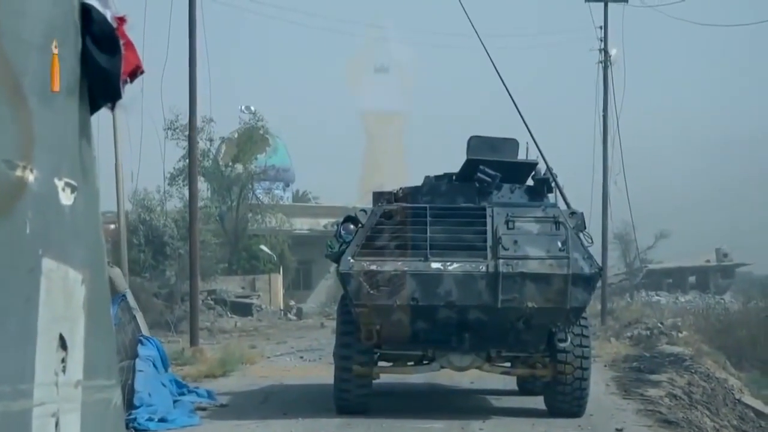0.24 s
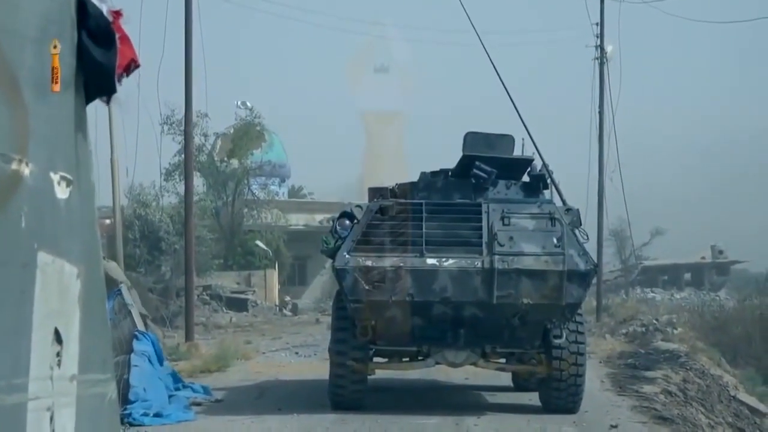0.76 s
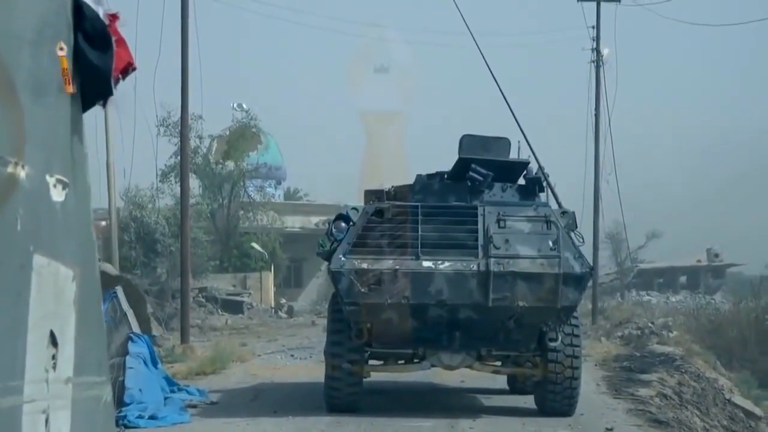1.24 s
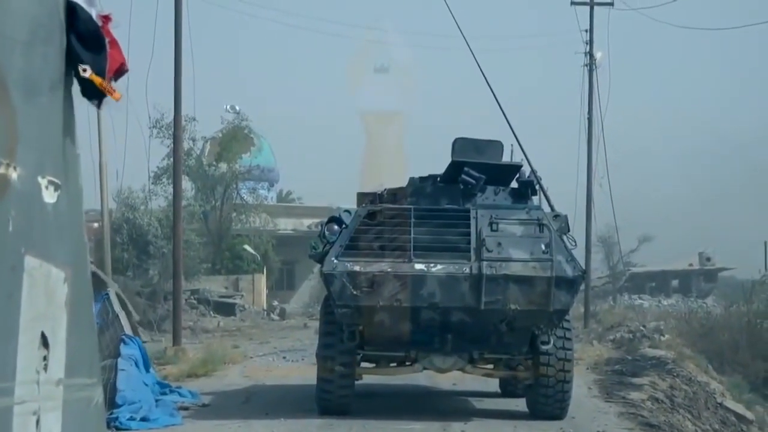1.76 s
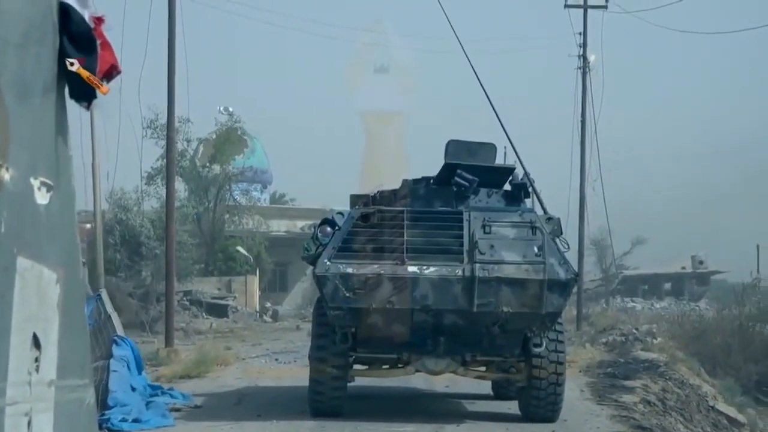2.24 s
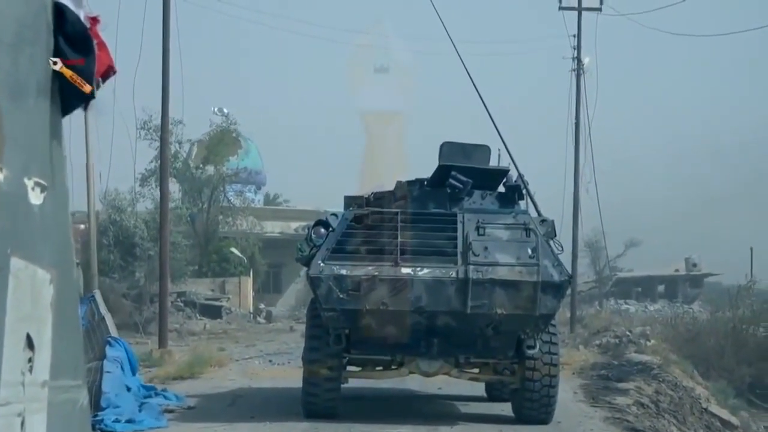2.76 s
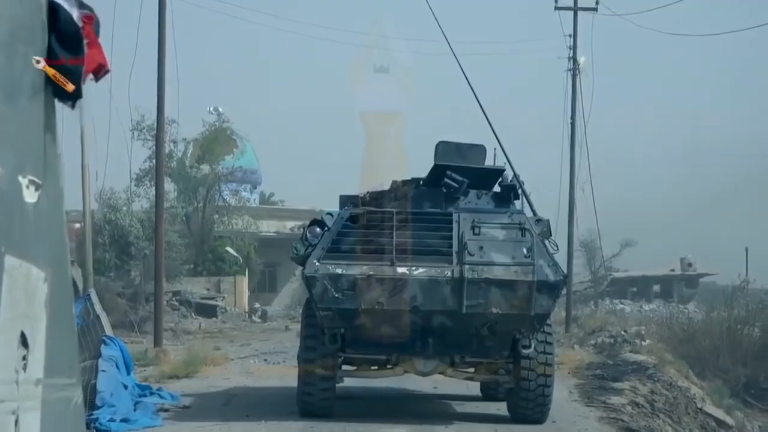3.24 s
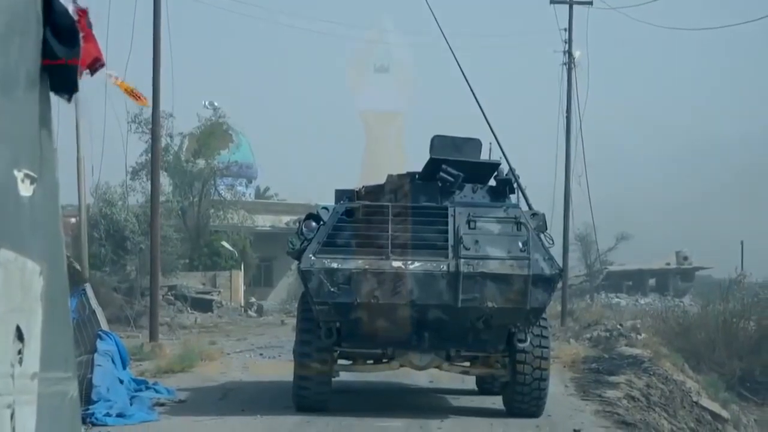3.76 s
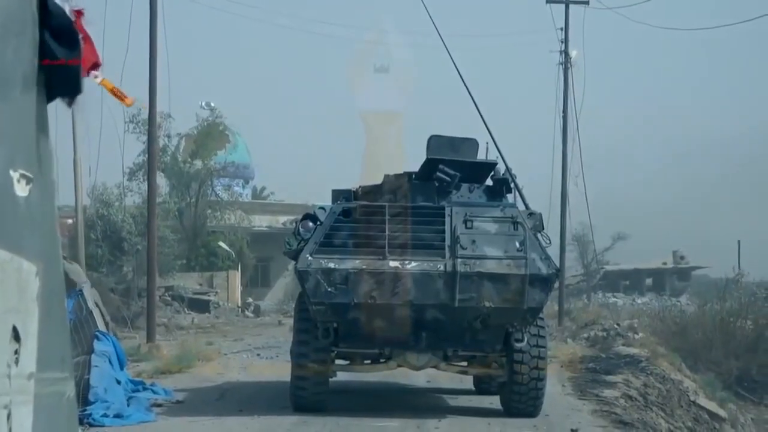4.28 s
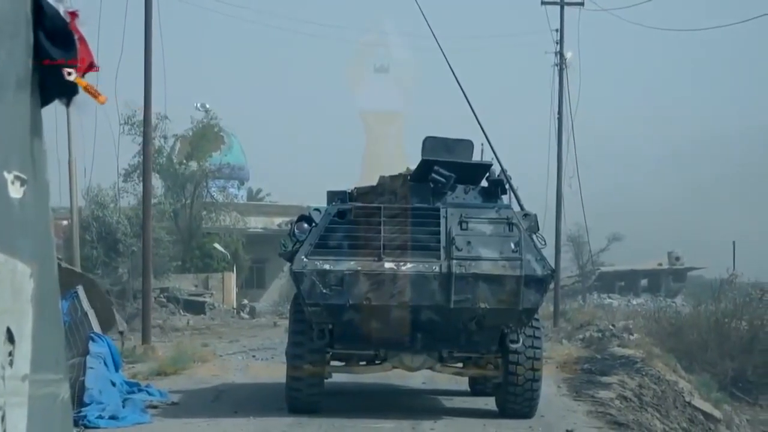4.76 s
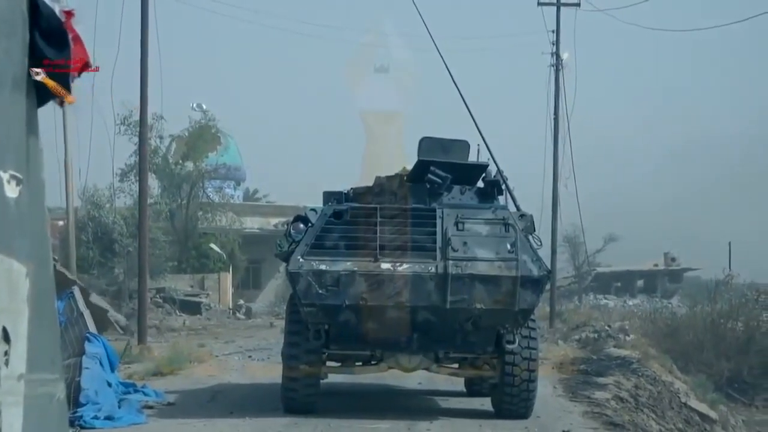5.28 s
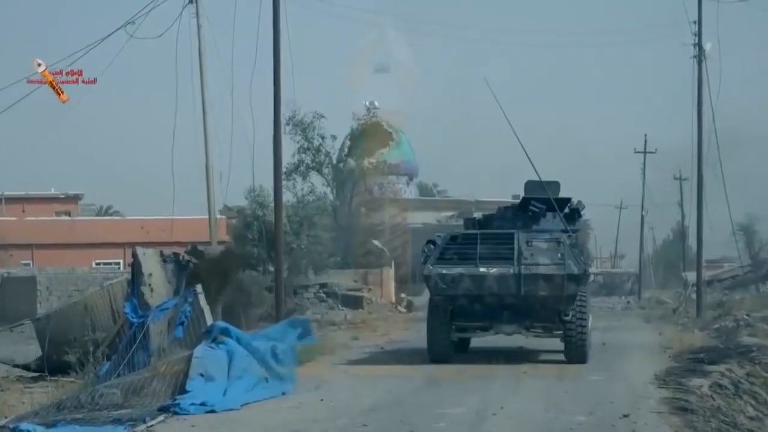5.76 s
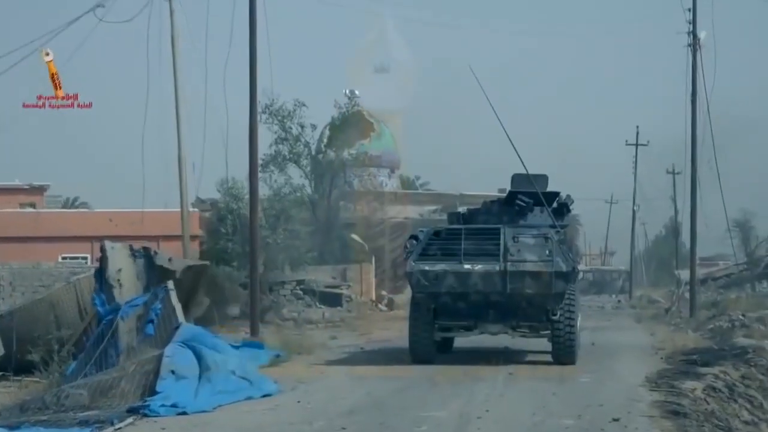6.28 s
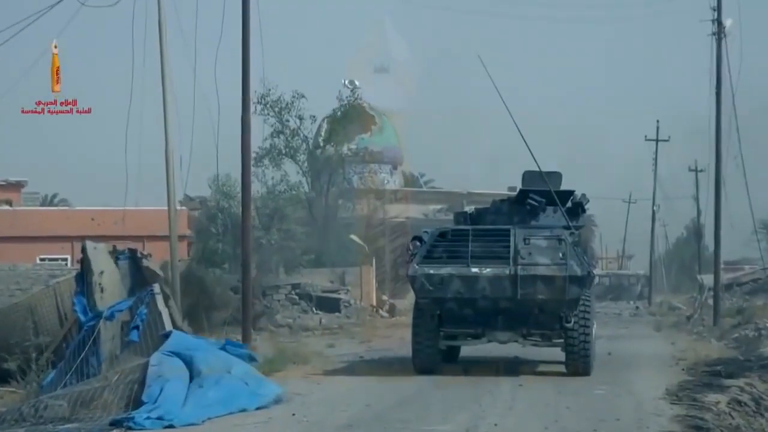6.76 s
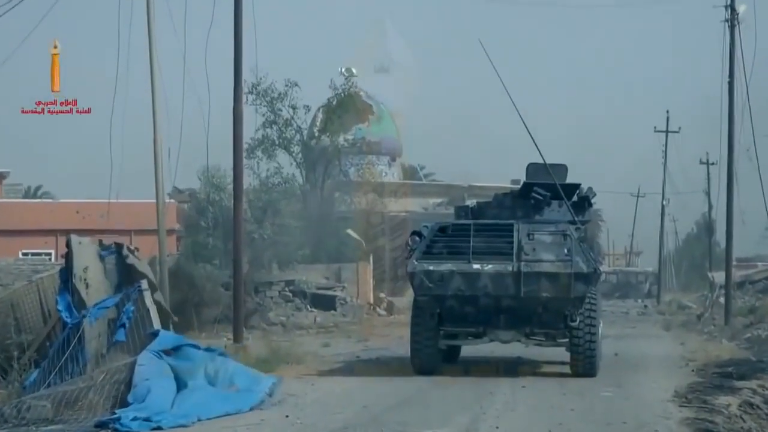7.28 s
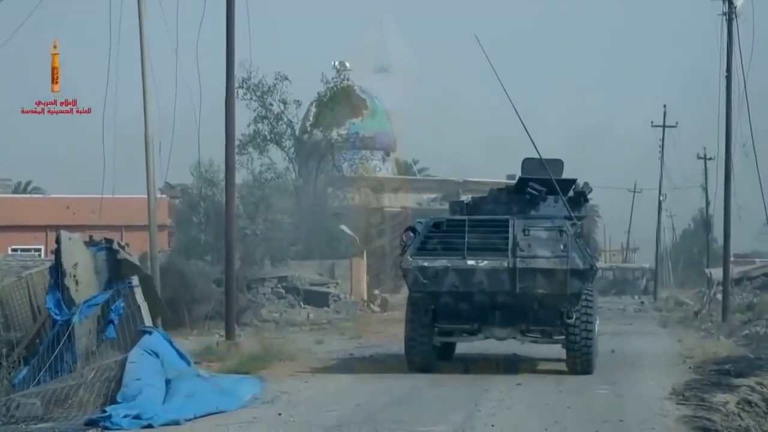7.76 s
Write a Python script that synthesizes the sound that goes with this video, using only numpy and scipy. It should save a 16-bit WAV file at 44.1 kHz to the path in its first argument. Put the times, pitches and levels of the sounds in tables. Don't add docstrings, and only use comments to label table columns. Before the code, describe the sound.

Rifle shots crack and echo between houses, then an armoured vehicle's heavy gun hammers out a long burst over its idling diesel engine.

```python
import sys
import numpy as np
from scipy import signal
from scipy.fft import rfft, irfft
from scipy.io import wavfile

SR = 44100
rng = np.random.default_rng(int(sys.argv[2]) if len(sys.argv) > 2 else 0)


def materialize(psi):
    bounded = np.clip(np.atleast_2d(psi).T, -1, 1)
    quanta = np.round(bounded * 32767).astype(np.int16)
    wavfile.write(sys.argv[1], SR, quanta)


def natural_amplitude(level_db):
    exponent = np.asarray(level_db, float) / 20
    return 10 ** exponent


N = 353682


def rms_one(x):
    return x / np.sqrt(np.mean(x ** 2) + 1e-20)


def band(x, low_hz, high_hz, order=2):
    edges_hz = [low_hz, min(high_hz, .45 * SR)]
    return signal.sosfilt(signal.butter(order, edges_hz, "band", fs=SR, output="sos"), x)


def peaks(x, resonances):
    for hz, width_hz, db in resonances:
        r = np.exp(-np.pi * width_hz / SR)
        top = [(1 - r * r) / 2, 0, (r * r - 1) / 2]
        bottom = [1, -2 * r * np.cos(2 * np.pi * hz / SR), r * r]
        x = x + (natural_amplitude(db) - 1) * signal.lfilter(top, bottom, x)
    return x


def coloured(spectrum, size):
    hz, db = np.transpose(spectrum)
    log_hz = np.log(np.maximum(np.fft.rfftfreq(size, 1 / SR), 1))
    tilt = natural_amplitude(np.interp(log_hz, np.log(hz), db))
    return rms_one(irfft(rfft(rng.standard_normal(size)) * tilt, size))


def drift(rate_hz, size):
    r = np.exp(-2 * np.pi * rate_hz / SR)
    return rms_one(signal.lfilter([1], [1, -2 * r, r * r], rng.standard_normal(size + SR))[SR:])


def add(out, s, sound):
    i = round(s * SR)
    out[i:i + len(sound)] += sound[:len(out) - i]


def blast(length_ms):
    u = np.arange(int(length_ms * SR / 1000) + 2) * 1000 / (length_ms * SR)
    return np.sin(2 * np.pi * np.minimum(u, 1) ** .75)


def fading(t60_s, size):
    return np.exp(-np.log(1000) * np.arange(size) / SR / t60_s)


def swells(t, peak_s, db, rise_s, fall_s):
    late = t[:, None] - peak_s
    rising, falling = -late / np.maximum(rise_s, 1e-4), late / np.maximum(fall_s, 1e-3)
    down = np.where(late < 0, rising, falling)
    return np.sqrt(np.sum(natural_amplitude(db - 20 * np.minimum(down, 10)) ** 2, axis=1))


# (f/Hz, level/dB per Hz)
SCATTER_COLOUR = [(24, -70), (40, -3.5), (220, 6), (697, -10.5), (1180, -6.5), (3560, -13.5), (4570, -23),
                  (5580, -26.5), (7730, -31), (8770, -39.5), (13800, -47.5), (16000, -69)]
ROUND_S = [5.4788, 5.6531, 5.8188, 5.9904, 6.1472, 6.3135, 6.4829, 6.6578, 6.8358, 7.0074, 7.1907, 7.3792,
           7.5535, 7.7275, 7.8952]
# (blast level/dB, far wall level/dB)
ROUND_DB = [(-1.5, -5), (-0.2, -5), (1.3, -6), (0, -10), (-2, -22), (-1.6, -8), (-1.5, -5), (-3.2, 0.5),
            (-3.5, -0.5), (-2.2, -1), (-2, -1), (-2, 3.5), (-2.5, -1.5), (-1.7, -4), (-2.5, -1)]
PATH_MS = [.08, .9, 2.45, 3.3, 4.3, 7.0, 8.5, 13.4, 15.95, 17.7, 23.7, 91.1]
PULSE_MS = [.75, 1.25, .75, 1.1, 1.5, 1.2, 3.0, 1.8, .7, 1.5, 1.0, .8]
PATH_DB = [2.5, -1, -2, -3, -5, -10, -8, -14, -3, -12, -8, -2]
CRACK_DB = [-6.5, -28, -12, -29, -17, -31, -29, -23, -18.5, -35, -21, -27]
# (t/s after blast, level/dB, bass against treble/dB, 20 dB rise t/s, 20 dB fall t/s)
SCATTER = [
    (-.022, -28.5, -4, .006, .11),
    (.003, -19, -12, .006, .02),
    (.0165, -20, -12, .003, .012),
    (.024, -24, -6, .003, .025),
    (.034, -33, 2, .015, .012),
    (.082, -27, -9, .05, .11),
    (.092, -21.5, -4, .003, .035),
    (.12, -28, -3, .05, .33),
]


def heavy_gun(repeat=0.73, grain_db=3.0):
    out, size, lead_s = np.zeros(N + SR), int(.55 * SR), .03
    s, high_db, bass_db, rise_s, fall_s = np.transpose(SCATTER)
    t = np.arange(size) / SR - lead_s
    low_shape = swells(t, s, high_db + bass_db, rise_s, fall_s)
    high_shape = swells(t, s, high_db, rise_s, fall_s)
    same = coloured(SCATTER_COLOUR, size) * natural_amplitude(grain_db * drift(180, size))
    push_t = np.arange(2000) / SR
    swing = push_t / .0045
    push = np.sin(2 * np.pi * 208 * push_t - 3.6) * swing * np.exp(1 - swing)
    push_db, echo_s, echo_db = -13, .0691, 1
    for at, (db, wall_db) in zip(ROUND_S, ROUND_DB):
        gain = natural_amplitude(db - 2.5)
        for delay_ms, length_ms, path_db, crack_db in zip(PATH_MS, PULSE_MS, PATH_DB, CRACK_DB):
            wobble = rng.normal(0, 1, 3)
            late = at + delay_ms / 1000 + 4e-5 * wobble[0]
            if delay_ms == PATH_MS[-1]:
                gain = gain * natural_amplitude(wall_db)
            pulse = blast(length_ms * (1 + .08 * wobble[2]))
            add(out, late, gain * natural_amplitude(path_db + 1.2 * wobble[1]) * pulse)
            crack = rng.standard_normal(1200) * fading(.01, 1200)
            add(out, late, gain * natural_amplitude(crack_db) * band(crack, 2200, 7500, order=1))
        add(out, at + .0001, natural_amplitude(db + push_db) * push)
        short_push = push * np.exp(-push_t / .012)
        add(out, at + echo_s, natural_amplitude(db + push_db + echo_db) * short_push)
        fresh = coloured(SCATTER_COLOUR, size) * natural_amplitude(grain_db * drift(188, size))
        scatter = rms_one(repeat * same + fresh)
        low = band(scatter, 30, 700)
        add(out, at - lead_s, natural_amplitude(8.5) * (low * low_shape + (scatter - low) * high_shape))
    return out[:N]


# (t/s, N wave level/dB, N wave t/ms, crack level/dB, bright edge level/dB)
SHOTS = [(0.938, -34, 1.1, -45, -55), (0.9617, -3, 1.2, -10, -31), (.963, 4.5, 1.03, -25, -18),
         (0.9641, -6, 0.93, -11.5, -14), (1.0202, -5.5, 1.3, -19, -28), (1.366, -22.5, 3.8, -31, -47),
         (1.3769, -8, 0.63, -19.5, -28), (1.892, -7.5, 1.4, -19, -34), (1.9659, -14, 0.29, -21, -52),
         (3.14, -37, 0.92, -54, -52), (3.187, -40, .9, -43, -46), (3.194, -50, .9, -46, -48),
         (5.6504, -2, 0.28, -8.5, -37), (6.987, -13, 0.52, -17, -44), (7.362, -17, 0.61, -10.5, -31),
         (7.878, -22, 0.43, -12.5, -42)]
# (t/s, N wave level/dB, N wave t/ms, crack level/dB)
SLAPS = [(0.9707, -9.5, 1.57, -41), (.974, -14, 3.2, -45), (1.015, -18, 1.8, -44),
         (1.0272, -14.5, 2.2, -30), (1.19, -23, 2.1, -34), (1.2098, -16, 2.3, -20.5),
         (1.226, -19, 2.6, -47), (1.251, -21, 2.7, -36), (1.279, -15, 0.65, -28.5), (1.353, -39.5, .8, -42),
         (1.426, -28, 0.98, -37), (1.498, -38, 1.1, -46), (1.527, -37, .32, -37.5), (1.583, -30.5, 2, -54),
         (1.892, -13, 3.8, -28), (1.9663, -7.5, 4.6, -20), (1.995, -14, 1, -33), (2.025, -12, 1.23, -28),
         (2.028, -23, 6.1, -35), (2.159, -30, 6.9, -46), (2.216, -24, 1.9, -49), (2.304, -24, 1.3, -39),
         (2.442, -31, 1.4, -47), (2.747, -26, 1.05, -52.5)]


def rifles():
    out, size = np.zeros(N), 8192
    shot_t60_s, slap_t60_s = 0.042, 0.05
    near = [(*row, shot_t60_s) for row in SHOTS]
    far = [(*row, -61 + 1.3 * (row[-1] + 30), slap_t60_s) for row in SLAPS]
    for at, wave_db, length_ms, crack_db, edge_db, t60_s in near + far:
        noise, fade = coloured(SCATTER_COLOUR, size), fading(t60_s, size)
        top_hz = min(16000 * natural_amplitude(.6 * wave_db), 16000)
        wave = band(np.pad(blast(length_ms), (0, 400)), 20, top_hz)
        add(out, at, natural_amplitude(wave_db) * wave)
        add(out, at, natural_amplitude(crack_db) * rms_one(band(noise, 570, 6600)) * fade)
        add(out, at, natural_amplitude(edge_db) * rms_one(band(noise, 4300, 15000)) * fade ** 2)
    return out


# (loudest t/s, level/dB, 20 dB rise t/s, 20 dB fall t/s)
CRACKLE = [
    (1.861, -14.5, .0008, .02),
    (1.868, -16, .006, .025),
    (1.891, -10, .012, .011),
    (1.965, -19, .03, .045),
]


def crackle(per_s=5400.0, spread_db=3.5):
    out, t = np.zeros(N), np.arange(1.85, 2.05, 1 / SR)
    sizes = natural_amplitude(spread_db * np.minimum(rng.exponential(1, len(t)), 4))
    sizes = sizes * rng.choice([-1, 1], len(t))
    happens = rng.random(len(t)) < per_s / SR
    snaps = band(band(sizes * happens, 600, 3020), 370, 3400, order=1)
    add(out, t[0], swells(t, *np.transpose(CRACKLE)) * rms_one(snaps))
    return out


# (loudest t/s, level/dB, dullness/dB, 20 dB rise t/s, 20 dB fall t/s)
ROLLS = [(.28, -47.5, 12, 0.3, 0.4), (.345, -57, -2, 0.2, .07), (0.974, -38, 6, 0.0639, 0.1),
         (1.035, -34, -0.5, 0.1057, 0.22), (1.109, -32.5, 1.2, 0.13, 0.12), (1.2, -37.5, 1.5, 0.11, 0.24),
         (1.3, -35, 12, -0.23, -0.04), (1.42, -49.5, 2, 0.2, 0.37), (1.898, -28, 3, -0.02, -0.08),
         (1.972, -26.5, 4.5, 0.08, -0.03), (2.033, -33, 8, 0.08, 0.5649), (2.474, -39, 17, -0.05, 0.03),
         (2.9, -51, 21, 0.2, 0.9), (3.19, -50, 4, 0.13, 0.3), (5.454, -25.5, 7, -0.003, 0.23),
         (5.59, -27, 2, .06, 0.22)]
# (level/dB, share of dullness [ratio], speed of fall [ratio])
ROLL_BANDS = [(1, 0.014, 1.14), (0.7, 0.023, 1.24), (0.7, 0.018, 0.86), (-2.8, 0.57, 1.6), (-9.5, 2.9, 2.8)]


def rolls(grain_db=1.2):
    s, db, dull_db, rise_s, fall_s = np.transpose(ROLLS)
    out, t, lumps = 0, np.arange(N) / SR, natural_amplitude(grain_db * drift(115, N))
    coarse_t = t[::32]
    edges_hz = [(70, 330), (330, 700), (700, 2800), (2800, 6200), (6200, 15500)]
    for (low_hz, high_hz), (band_db, share, speed) in zip(edges_hz, ROLL_BANDS):
        shape = swells(coarse_t, s, db + band_db - share * dull_db, rise_s, fall_s / speed)
        noise = rms_one(band(coloured(SCATTER_COLOUR, N), low_hz, high_hz))
        out = out + np.interp(t, coarse_t, shape) * noise
    return out * lumps


# (t/s, level/dB)
ENGINE = [(0, -44.5), (.4, -41), (1.4, -42), (1.55, -44.5), (2.3, -43.5), (3.0, -42), (3.8, -39),
          (4.6, -37), (5.44, -36), (8.02, -49)]
# (multiple of firing rate [count], level/dB)
ORDERS_DB = [(1, -22), (2, -28), (3, -25), (4, -21), (6, -6), (8, -25.5), (12, -22.5)]
# (f/Hz, level/dB per Hz)
CLATTER = [(30, -33), (60, -22), (110, -21), (200, -18), (300, -19), (520, -19.5), (750, -12), (1000, -11),
           (1400, -19.5), (2000, -18.5), (3800, -27.5), (4150, -33), (8000, -47), (9000, -53),
           (13000, -57.5), (16000, -80)]
# (f/Hz, width f/Hz, level/dB)
HULL = [(149, 42, 4), (227, 35, 8), (470, 16, 8), (575, 33, 7), (918, 83, 6), (1077, 22, 8.5),
        (1139, 22, 7.5), (1245, 25, 7), (1800, 540, 5)]


def engine():
    t = np.arange(N) / SR
    clatter_db = np.interp(t, *np.transpose(ENGINE))
    loud_s, duck_db, recover_s = [0.99, 2.2, *ROUND_S], 29, 0.28
    duck = np.max([(t > s) * np.clip(1 - (t - s) / recover_s, 0, 1) for s in loud_s], axis=0)
    hum_db = -42 + 1.3 * (clatter_db + 42) - duck_db * duck
    firing_hz = 38.57 * (1 + 0.00217 * drift(1.37, N))
    turn = 2 * np.pi * np.cumsum(firing_hz) / SR
    hum = np.zeros(N)
    for k, db in ORDERS_DB:
        hum += np.sqrt(2) * natural_amplitude(db + 0.29 * drift(0.91, N)) * np.sin(k * turn + k * k)
    throb = natural_amplitude(0.24 * np.sin(turn) + 1.0 * np.sin(turn / 2) + 0.46 * drift(24, N))
    clatter = rms_one(peaks(coloured(CLATTER, N), HULL) * throb)
    air = band(clatter, 4100, 17000)
    clatter = clatter + (natural_amplitude(0.36 * (clatter_db + 43.5)) - 1) * air
    return natural_amplitude(hum_db) * hum + natural_amplitude(clatter_db) * clatter


def scene():
    guns = band(heavy_gun() + rifles() + crackle() + rolls(), 105, 18000)
    return (guns + engine())[None]


def low_pass(x):
    return signal.sosfilt(signal.butter(12, 16510, fs=SR, output="sos"), x)


# (f/Hz, width f/Hz, level/dB)
MICROPHONE = [(3816, 62, 4.5), (5500, 520, 7), (7650, 400, 6), (11000, 640, -6)]


def record(dry):
    ceiling = .8
    level = peaks(dry, MICROPHONE) / ceiling
    limited = ceiling * level / (1 + level ** 4) ** .25
    mix = signal.sosfilt(signal.butter(12, 15400, fs=SR, output="sos"), limited)
    return low_pass(mix)


dry = scene()
out = record(dry)
materialize(out)
```